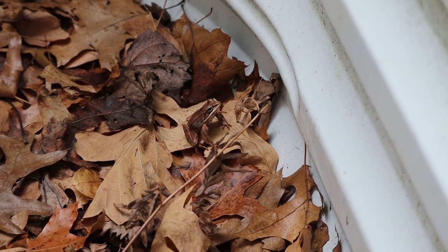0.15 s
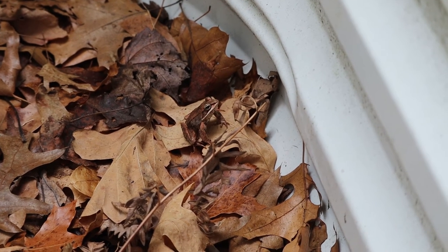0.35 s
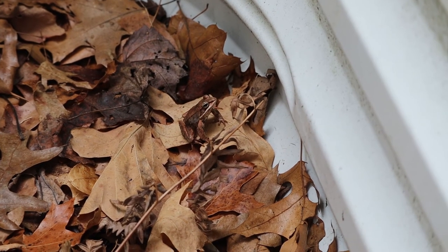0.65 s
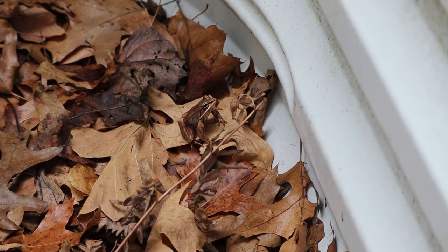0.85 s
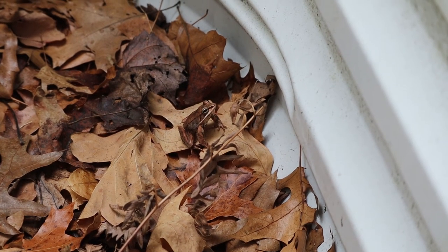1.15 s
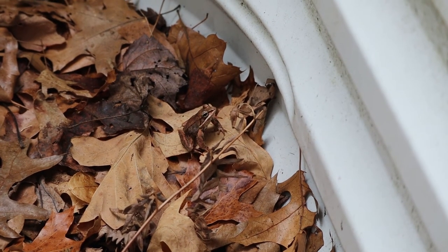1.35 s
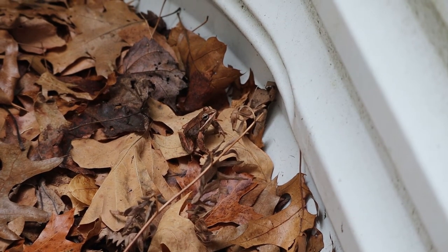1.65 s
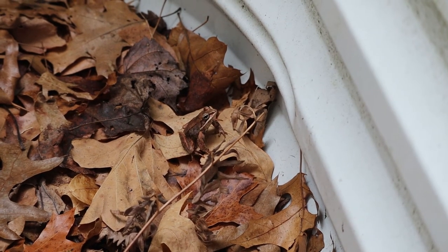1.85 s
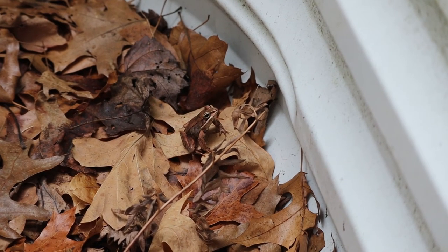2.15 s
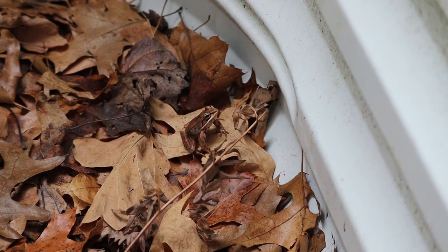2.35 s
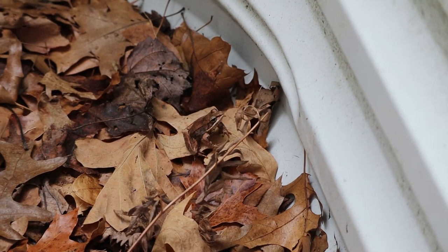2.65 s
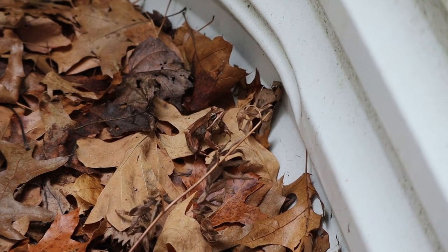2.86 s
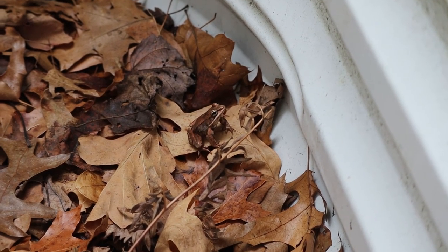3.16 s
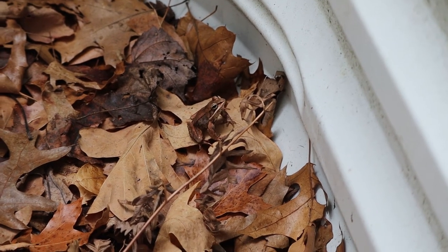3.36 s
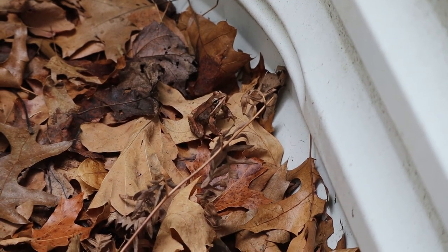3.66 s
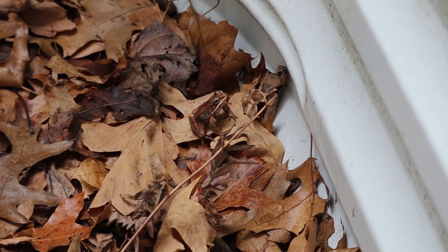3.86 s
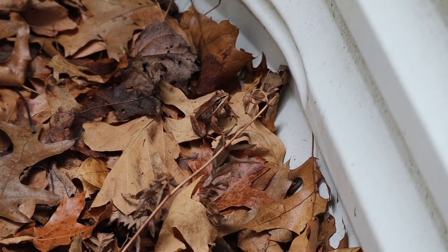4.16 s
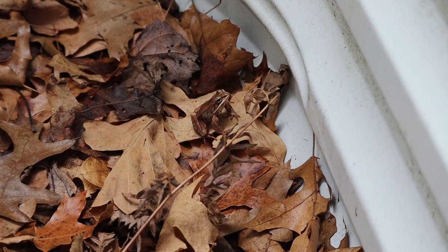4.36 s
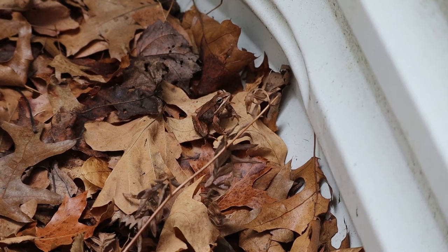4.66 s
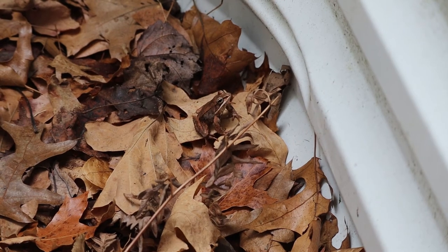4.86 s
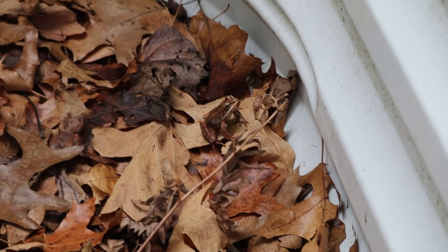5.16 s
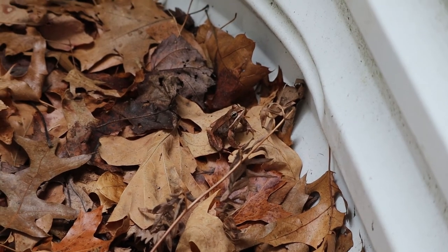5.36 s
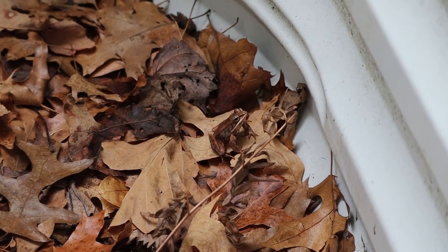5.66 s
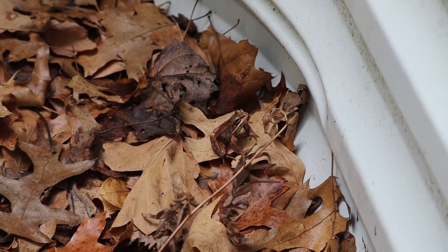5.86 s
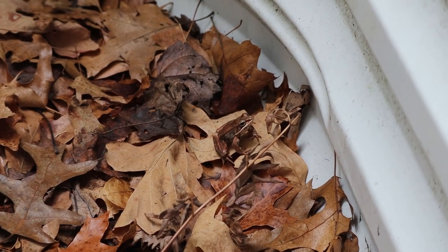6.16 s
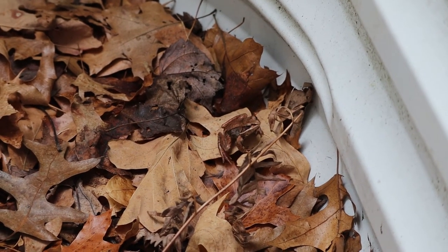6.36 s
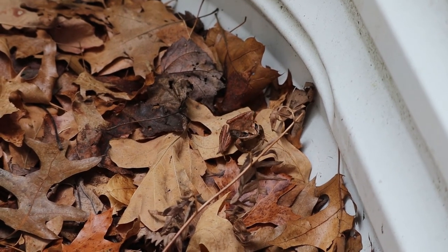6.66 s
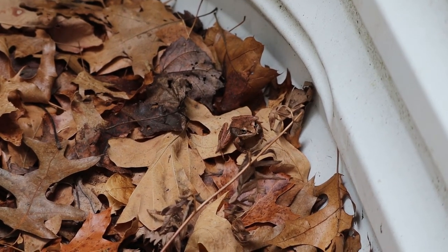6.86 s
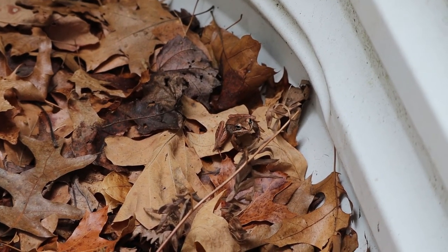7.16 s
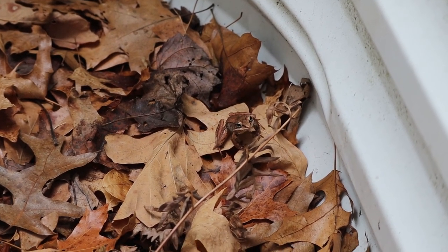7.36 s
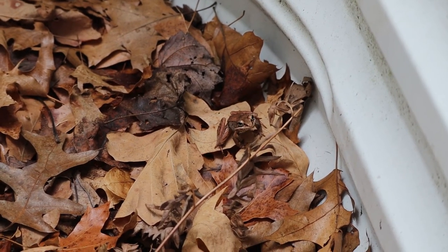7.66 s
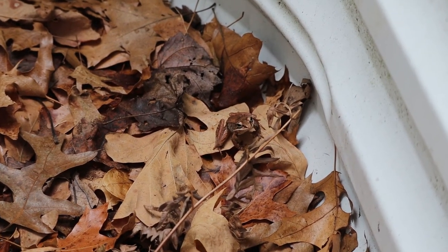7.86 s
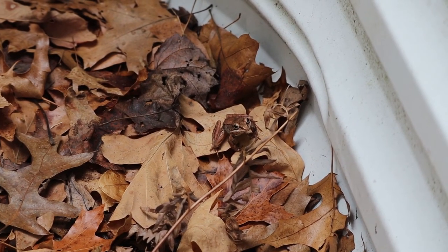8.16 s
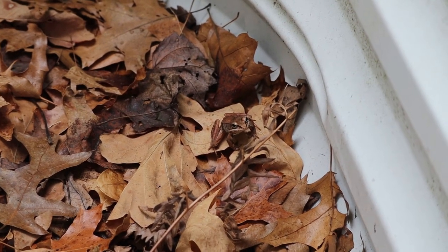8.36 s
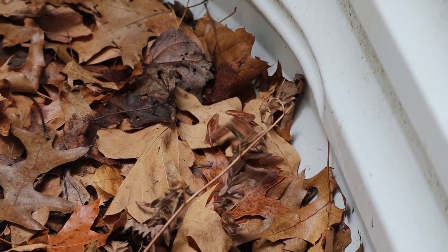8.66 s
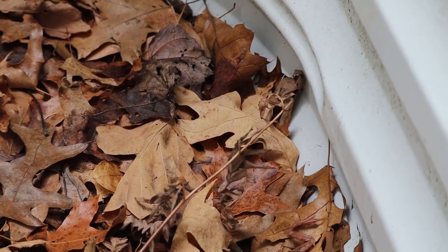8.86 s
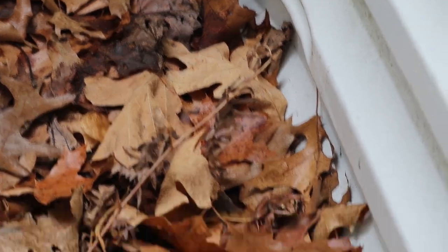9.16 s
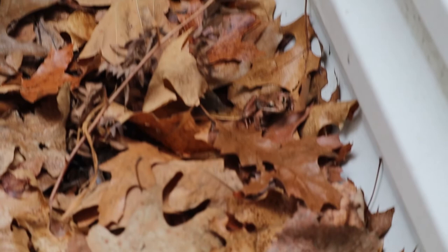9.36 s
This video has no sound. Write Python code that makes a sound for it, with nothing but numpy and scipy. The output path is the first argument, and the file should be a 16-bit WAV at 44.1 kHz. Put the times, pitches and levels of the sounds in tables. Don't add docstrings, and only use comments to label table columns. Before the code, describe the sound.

Several frogs quack hoarsely in a small hard-walled space lined with dry leaves. Single barks about a second apart lead into overlapping croaks, busiest around four to five seconds, then separate bursts return. Low clucks and faint distant calls fill gaps. The microphone is close; short boxy echoes are cut off into a thin quiet hum.

```python
import sys
import numpy as np
from scipy import signal
from scipy.fft import rfft, irfft
from scipy.io import wavfile
from scipy.ndimage import uniform_filter1d

SR = 44100
rng = np.random.default_rng(int(sys.argv[2]) if len(sys.argv) > 2 else 0)


def to_wav(sig):
    pcm = np.clip(np.atleast_2d(sig), -1, 1) * 32767
    pcm = np.round(pcm).astype(np.int16)
    wavfile.write(sys.argv[1], SR, pcm.T)


def how_loud(loudness_db):
    steps = np.asarray(loudness_db, float) / 20
    return 10 ** steps


N = 419391
RING = 12288
LEAD = .01


def evened(x):
    return x / np.sqrt(np.mean(x ** 2) + 1e-20)


def read(points, hz):
    f, value = np.transpose(points)
    return np.interp(np.log(hz + 1), np.log(f + 1), value)


def add(mix, s, sound):
    at = round(s * SR)
    sound = sound[max(-at, 0):]
    part = mix[max(at, 0):][:len(sound)]
    part += sound[:len(part)]


def resonate(x, hz, width):
    r = np.exp(-np.pi * width / SR)
    return 2 * signal.lfilter([1 - r], [1, -r * np.exp(2j * np.pi * hz / SR)], x).real


def coloured(x, points):
    return irfft(rfft(x) * how_loud(read(points, np.fft.rfftfreq(len(x), 1 / SR))), len(x))


def peaked(x, db):
    return how_loud(db) * x / np.sqrt(uniform_filter1d(x ** 2, size=300).max())


def croak(row, length, rasp_db, noise):
    # frequency in Hz, level in dB.
    voice_band = [(120, -59.5), (250, -22.5), (380, -9.5), (500, -1.5), (1650, 1.5), (1850, -9.5),
                  (2600, -38.5), (5000, -83)]
    # frequency in Hz, level in dB per Hz.
    rasp_band = [(1500, -27), (1900, 7), (2300, -5), (2700, -10.5), (3350, -12), (3650, -28), (4200, -33.5),
                 (5000, -44)]
    pulses_per_s, rough = 210, 0.36
    tone_db, sag = -3.5, 0.071
    rasp_lag_s = .005
    s, db, low_hz, high_hz, strain_db = row

    t = np.arange(RING) / SR - LEAD
    part = np.clip(t / length, 0, 1)
    effort = abs(np.sin(np.pi * part ** 1.1)) ** 1.3
    wobble = evened(uniform_filter1d(noise[0], size=250))

    turns = np.cumsum(pulses_per_s * (1 + .15 * wobble)) / SR
    pulses = np.diff(np.floor(turns), prepend=0) * how_loud(2.1 * noise[1])
    puffs = np.exp(-(turns % 1) / .4) * noise[2]
    drive = effort * ((1 - rough) * evened(pulses) + rough * evened(puffs))

    glide = 2 * np.pi * np.cumsum(1 + sag * (.5 - part) + .02 * wobble) / SR
    swell = abs(np.sin(np.pi * part ** 0.97)) ** 0.54
    tone = swell * (np.sin(low_hz * glide) + how_loud(strain_db) * np.sin(high_hz * glide))

    low = resonate(resonate(drive, low_hz, 65), low_hz, 580)
    low = low + 0.04 * resonate(drive, 0.76 * low_hz, 240)
    hoarse = 0.93 * resonate(drive, high_hz, 240) + resonate(drive, high_hz, 200)
    hoarse = hoarse - 0.79 * resonate(drive, 0.84 * low_hz, 140)
    throat = how_loud(tone_db) * evened(tone) + evened(low) - how_loud(strain_db) * evened(hoarse)

    rasp_db = rasp_db + 0.7 * strain_db + .4 * max(db + 11, -12) + 9.0
    breath = np.roll(effort, round(rasp_lag_s * SR)) * puffs
    rasp = how_loud(rasp_db) * evened(coloured(breath, rasp_band))
    voice = coloured(throat, voice_band) + rasp
    return s - LEAD - .011, peaked(walls(voice, noise[3], tail_db=2.5, modes_db=-9.5), db - 7.0)


def cluck(row, noise):
    # frequency in Hz, level in dB.
    cluck_band = [(70, -45), (180, -6), (300, 0), (1700, 0), (2300, -12), (3000, -40), (5000, -70)]
    s, db, hz, t60, click_db = row
    t = np.maximum(np.arange(RING) / SR - LEAD, 0)
    ring = np.sin(2 * np.pi * hz * t) * how_loud(-60 * t / t60) * (1 - np.exp(-t / .0005))
    click = resonate(noise[0] * t * np.exp(-t / .003), 1200, 800)
    voice = coloured(evened(ring) + how_loud(click_db) * evened(click), cluck_band)
    return s - LEAD + 0.0028, peaked(walls(voice, noise[1], tail_db=2.0, modes_db=-20.0), db - 6.0)


def wheeze(row, noise):
    # frequency in Hz, level in dB.
    air_band = [(2500, -27), (3300, 8.5), (6600, -2.5), (7400, -29.5), (9000, -57.5)]
    s, db, hz, length = row
    width = .2 * hz
    t = np.arange(RING) / SR
    breath = np.exp(-((t - length) / (0.47 * length)) ** 2)
    breath = signal.lfilter([1], [1, -np.exp(-1 / (0.012 * SR))], breath)
    flutter = how_loud(2.4 * evened(uniform_filter1d(noise[1], size=120)))
    air = resonate(resonate(noise[0], hz, width), hz, 1.4 * width)
    return s - length - .008, peaked(breath * flutter * coloured(air, air_band), db - 3.5)


def pip(row, noise):
    s, db, hz, length = row
    part = np.clip(np.arange(RING) / SR / length, 0, 1)
    waver = evened(uniform_filter1d(noise, size=300))
    swell = abs(np.sin(np.pi * part ** 0.52)) * how_loud(0.61 * waver)
    return s, how_loud(db + 3.5) * swell * np.sin(2 * np.pi * hz * np.cumsum(1 + .015 * waver) / SR)


def frogs():
    # peak time in seconds, peak level in dB, low resonance in Hz,
    # high resonance in Hz, strain in dB.
    croaks = [(1.739, -8.5, 744, 1360, -13), (2.045, -30, 753, 1480, -8), (2.147, -14.5, 695, 1391, 0.5),
              (2.722, -17, 732, 1299, -1), (3.664, -14, 690, 1517, -8), (3.699, -13.5, 683, 1325, -1.5),
              (3.91, -26, 753, 1550, -8), (4.011, -11, 757.3, 1444, -1.5), (4.15, -23, 614, 1245, -14),
              (4.217, -14.5, 697.3, 1495, -10.5), (4.542, -15, 604.6, 1475, -6.5),
              (4.74, -14.5, 609, 1290, -5.5), (4.841, -7.5, 744, 1424, -0.5), (5.208, -16, 706, 1417, -5.5),
              (5.367, -17, 780, 1436, 11), (5.706, -22, 615, 1460, 8.5), (5.782, -11.5, 739, 1287, 0.5),
              (6.339, -15, 732.4, 1465, -19)]
    drawls = [
        (1.79, -16, 794, 1500, -3),
        (3.763, -8, 718.4, 1416, 1.5),
        (3.811, -14.5, 750, 1385, -3),
        (4.305, -11.5, 714, 1519, 0),
        (4.622, -12, 699, 1447, -2),
        (4.884, -19.5, 756, 1325, -2.5),
        (6.509, -10, 834, 1500, 1),
        (6.538, -18, 808.6, 1531, -4),
        (8.899, -10.5, 792, 1474, -5.5),
        (8.934, -17.5, 643.6, 1340, -1.5),
    ]
    # time in seconds, peak level in dB, low resonance in Hz,
    # high resonance in Hz, rasp in dB.
    barks = [
        (0.022, -10.5, 781, 1484, -37.5),
        (1.017, -9, 769, 1432, -32),
        (1.84, -9.5, 770, 1310, -28),
        (4.947, -7.5, 816.5, 1463, -33.5),
        (5.054, -12.5, 770, 1388, -27.5),
        (6.441, -8.5, 772, 1384, -31),
        (7.837, -9.5, 794, 1482, -36.5),
        (8.263, -12, 772.4, 1310, -14),
        (8.824, -13.5, 807, 1355, -54),
    ]
    # time in seconds, peak level in
    # dB, low resonance in Hz, # strain in dB.
    more_croaks = [(0.003, -19.5, 1129, -8.5), (0.377, -53.5, 485, -21), (0.832, -41.5, 559, -37),
                   (0.912, -34.5, 729, -2.5), (1.302, -56.5, 537, -21), (1.558, -53, 513, -7),
                   (1.592, -47, 552, -27.5), (1.674, -35, 618, -8), (1.706, -29, 763, -8),
                   (2.377, -51, 511, -14.5), (2.619, -43, 689.6, -13.5), (3.283, -51.5, 443, -20),
                   (3.398, -36, 816, -26), (3.408, -50, 1200, -27), (3.472, -49.5, 481, -3.5),
                   (3.559, -31, 585, -29), (3.616, -25.5, 570.5, -10.5), (4.474, -32, 608, -33),
                   (5.551, -69, 603, -18), (5.589, -49.5, 595, -7.5), (5.64, -49, 587, -28),
                   (6.248, -41, 718, -12.5), (6.262, -44.5, 1182, -4), (7.375, -51, 469, -21),
                   (7.557, -44, 779, -21.5), (7.622, -34, 651, -25.5), (7.641, -44, 577, -16),
                   (7.717, -30.5, 766.5, -6), (8.724, -32, 715, -14), (9.505, -28.5, 687, -24)]
    # time in seconds, peak level in
    # dB, low resonance in Hz.
    second_phases = [(0.0445, -28.5, 1031), (1.0382, -19.5, 1096), (1.7749, -17, 1108), (3.7169, -18, 1112),
                     (4.0399, -22, 1148), (4.646, -19.5, 1148), (5.0667, -23.5, 1114), (5.3913, -34, 1178),
                     (6.464, -17.5, 1111), (6.5844, -19, 1252), (7.8614, -21, 1112), (8.282, -28, 1170),
                     (8.9423, -15, 1249)]
    # time in seconds, peak level in dB, pitch in Hz,
    # ring t60 in seconds, click level in dB.
    clucks = [(0.02, -21.5, 590, 0.01, -13.5), (0.547, -52.5, 277, 0.033, -9),
              (1.035, -32, 495, 0.023, -34.5), (1.74, -23, 499, 0.013, -12), (1.874, -27, 399, 0.0045, -17),
              (3.404, -31, 470, 0.012, -34), (4.375, -18.5, 542, 0.0068, -28.5),
              (4.869, -23, 580, 0.012, -4), (5.067, -27, 517, 0.016, -10),
              (5.838, -18.5, 511, 0.0063, -27.5), (6.176, -30.5, 500, 0.01, -5),
              (6.54, -17, 591.6, 0.019, -12.5), (7.748, -44.5, 291, 0.011, -12),
              (7.975, -15.5, 556, 0.014, -24), (8.317, -28.5, 540, 0.011, -17),
              (8.934, -23, 560, 0.011, -7), (3.84, -37.5, 387, .016, -34), (4.964, -33, 258, 0.0047, -27.5)]
    # peak time in seconds, peak level in dB,
    # centre in Hz, length in seconds.
    wheezes = [(1.058, -66, 4400, 0.041), (1.848, -71.5, 3500, .12), (3.789, -56, 3850, .059),
               (3.82, -53, 4850, 0.05), (4.049, -67, 4270, 0.053), (4.342, -56, 4740, 0.065),
               (4.656, -62.5, 4695, .06), (4.882, -57, 4800, 0.065), (5.088, -72, 4160, .097),
               (6.467, -72.5, 4000, .03), (6.523, -65.5, 4500, .05), (6.559, -51.5, 4420, .095),
               (7.86, -62.5, 3720, .06), (7.864, -66, 6070, .07), (8.295, -53, 4500, 0.062),
               (8.926, -64.5, 4750, .07), (8.941, -55, 4620, 0.084)]
    # time in seconds, level in dB, pitch in Hz,
    pips = [(.372, -56, 518, 0.029), (1.589, -51.5, 573, .02), (2.249, -38, 745, 0.046),
            (2.379, -61, 515, .04), (2.614, -46, 680, 0.027), (3.385, -43.5, 829, 0.059),
            (5.531, -58, 598, 0.079), (5.632, -48.5, 584, 0.03), (6.241, -47, 764, 0.045),
            (7.34, -64.5, 495, .05), (7.41, -65.5, 504, 0.063), (9.494, -29.5, 770, 0.032)]

    # its row, length in s, rasp in dB at no strain
    calls = [(row, .035, -35) for row in croaks]
    calls += [(row, .055, -27) for row in drawls]
    calls += [((s, db, hz, 1310, strain_db), .035, -29.5) for s, db, hz, strain_db in more_croaks]
    calls += [((s, db, hz, 1442, -9), .036, -21) for s, db, hz in second_phases]
    calls += [((s, db, low_hz, high_hz, -4.5), .035, rasp_db) for s, db, low_hz, high_hz, rasp_db in barks]

    mix = np.zeros(N)
    for row, length, rasp_db in calls:
        add(mix, *croak(row, length, rasp_db, rng.standard_normal((4, RING))))
    for row in clucks:
        add(mix, *cluck(row, rng.standard_normal((2, RING))))
    for row in wheezes:
        add(mix, *wheeze(row, rng.standard_normal((2, RING))))
    for row in pips:
        add(mix, *pip(row, rng.standard_normal(RING)))
    return mix


def walls(x, noise, tail_db, modes_db):
    # frequency in Hz, level in dB, t60 in seconds.
    wall_modes = [(511, -2.5, 0.51), (579.2, 8, 0.18), (732, 3.5, 0.086), (834, -11, 0.093),
                  (930, -31, 5.0), (953, -19.5, 0.09), (1016, -19, 0.71), (1250, 5, 0.09),
                  (1333, -6.5, 0.26), (1433, -2, 0.098), (1550, -2.5, 0.66), (1760, -13.5, 0.14)]
    # frequency in Hz, t60 in seconds.
    wall_t60 = [(250, 0.17), (500, .3), (790, 0.27), (1600, 0.32), (2300, .24), (5000, 0.099)]
    hz, frame, z = signal.stft(noise, SR, nperseg=256)
    decay = how_loud(-60 * frame / read(wall_t60, hz)[:, None])
    tail = signal.istft(z * decay, SR, nperseg=256)[1][:RING]
    t = np.arange(RING) / SR
    modes = np.zeros(RING)
    for k, (f, db, t60) in enumerate(wall_modes):
        ringing = how_loud(db - 60 * t / np.clip(t60, .1, .4))
        modes += ringing * np.sin(2 * np.pi * f * t + 3 * noise[k])
    reply = how_loud(tail_db) * evened(tail) + how_loud(modes_db) * evened(modes)
    reply *= (1 - np.exp(-t / 0.001)) / np.sqrt(RING)
    reply[0] = 1
    return signal.fftconvolve(x, reply)[:RING]


def suppressed(x, slope=3.7, deepest_db=22.5):
    # frequency in Hz, level in dB.
    gate = [(200, -74), (700, -75), (1500, -72), (3000, -85), (6000, -95.5)]
    # time in seconds, threshold rise in dB.
    clamps = [(.26, 2.5), (2.36, 4), (2.67, 8.5), (2.9, 5), (3.52, 7), (5.34, 11.5), (5.509, 13),
              (5.94, 14), (6.31, 10.5), (6.78, 8), (8.12, 15), (8.47, 7)]
    memory_s, bite_per_db, calm_db = 0.82, 0.328, -50.5
    clamp_s, wide_hz = 0.044, 2400
    hz, t, z = signal.stft(x, SR, nperseg=512, noverlap=384)
    power = uniform_filter1d(uniform_filter1d(abs(z) ** 2, size=5, axis=0), size=7, axis=1)
    power = np.where(hz[:, None] > wide_hz, uniform_filter1d(power, size=9, axis=0), power)

    keep = np.exp(-(t[1] - t[0]) / memory_s)
    loudness_db = 10 * np.log10(abs(power).sum(0) + 1e-20)
    busy_db = signal.lfilter([1 - keep], [1, -keep], np.maximum(loudness_db - calm_db, 0))
    clamp_db = sum(db * np.exp(-((t - s) / clamp_s) ** 2) for s, db in clamps)
    threshold_db = read(gate, hz)[:, None] + bite_per_db * busy_db + clamp_db
    under_db = threshold_db - 10 * np.log10(abs(power) + 1e-20)
    gain = how_loud(-np.clip(slope * under_db, 0, deepest_db))
    return signal.istft(z * gain, SR, nperseg=512, noverlap=384)[1][:N]


def floor():
    # frequency in Hz, level in dB per Hz.
    hiss_band = [(25, -36), (60, -21), (100, -10.5), (180, -3.5), (300, -5), (600, -11), (1200, -19.5),
                 (2500, -27), (5000, -31), (8000, -35), (11300, -37.5), (12500, -46), (14500, -52.5),
                 (16500, -51.5)]
    # frequency in Hz, width in Hz, level in dB.
    hum_lines = [
        (102, 5.8, -81.5),
        (181.5, 3, -73),
        (280.9, 7.6, -77),
    ]
    frames, hz = N // 256 + 5, np.fft.rfftfreq(1024, 1 / SR)
    a, b, patches = rng.standard_normal((frames, 513, 3)).T
    patches = evened(uniform_filter1d(uniform_filter1d(patches, size=5, axis=0), size=8, axis=1))
    patchy_db = read([(100, 1.5), (600, 1.8), (3000, 1.), (9000, .3)], hz)[:, None]
    z = (a + 1j * b) * how_loud(read(hiss_band, hz)[:, None] + patchy_db * patches)
    hiss = how_loud(-68) * evened(signal.istft(z, nperseg=1024, noverlap=768)[1][:N])
    noise = rng.standard_normal(N)
    return hiss + sum(how_loud(db) * evened(resonate(noise, f, width)) for f, width, db in hum_lines)


def scene():
    return (suppressed(frogs()) + floor())[None]


def roll_off(x):
    return signal.sosfilt(signal.butter(12, 15000, fs=SR, output="sos"), x)


def record(dry):
    return roll_off(dry)


dry = scene()
out = record(dry)
to_wav(out)
```